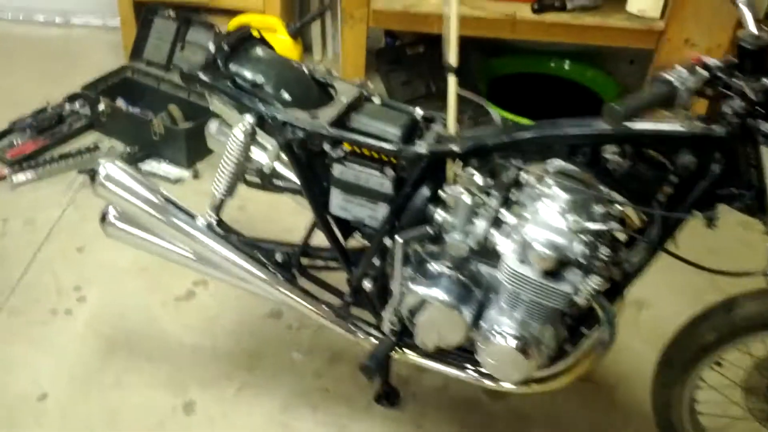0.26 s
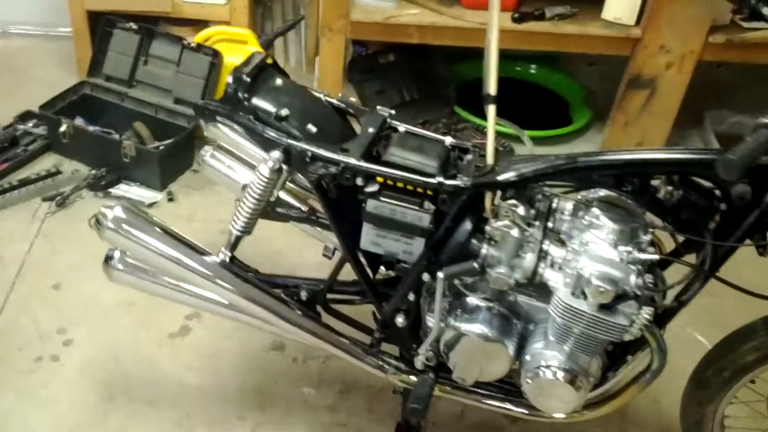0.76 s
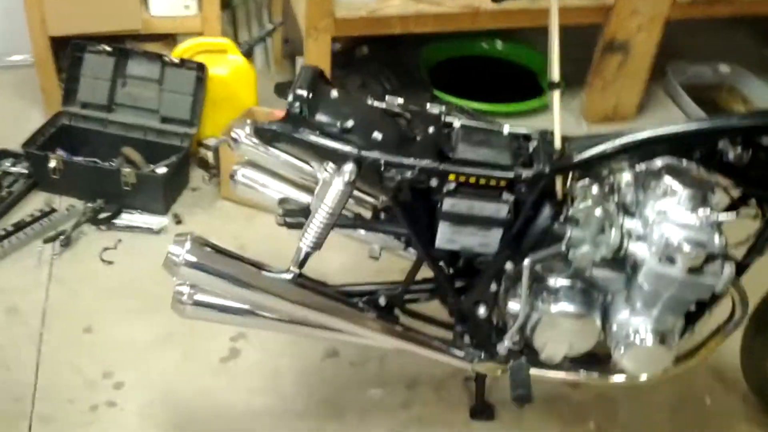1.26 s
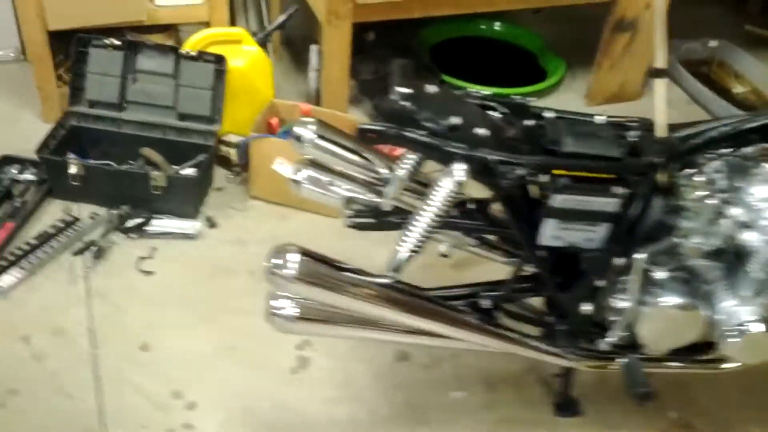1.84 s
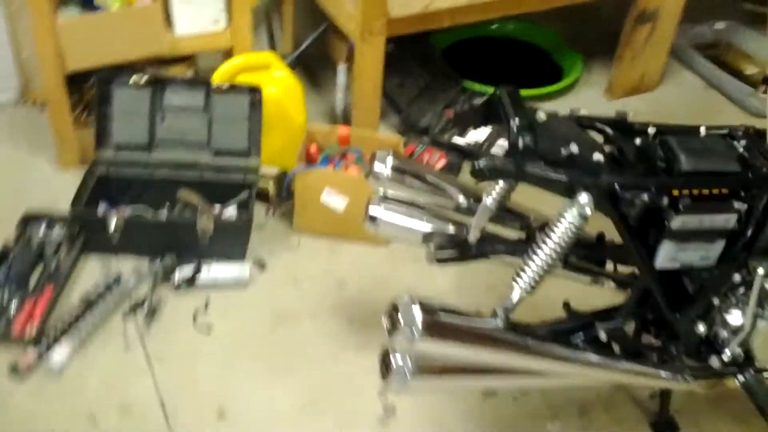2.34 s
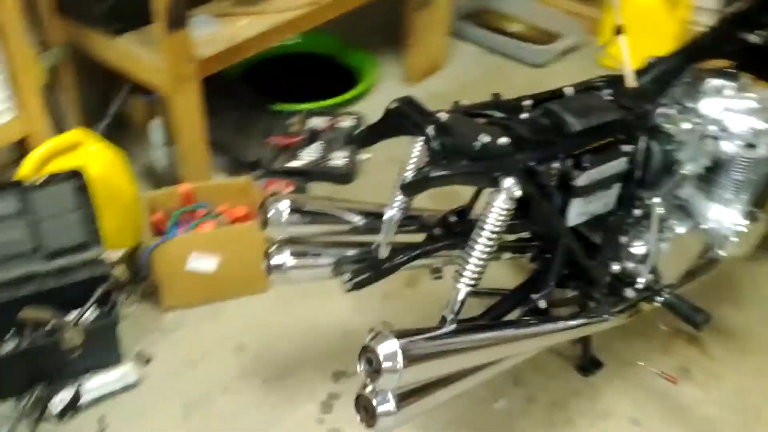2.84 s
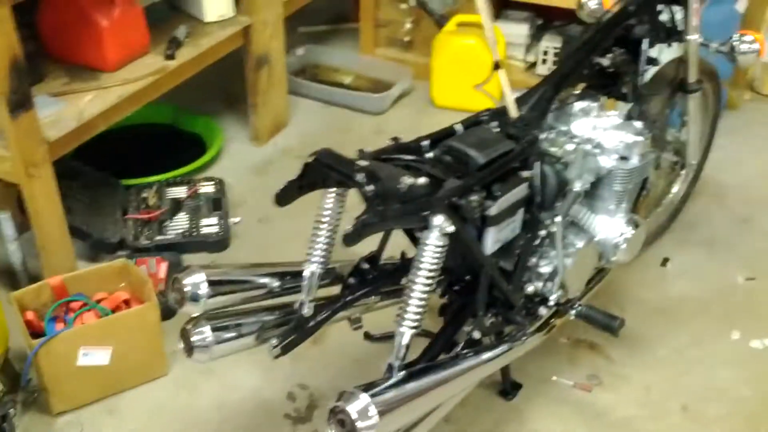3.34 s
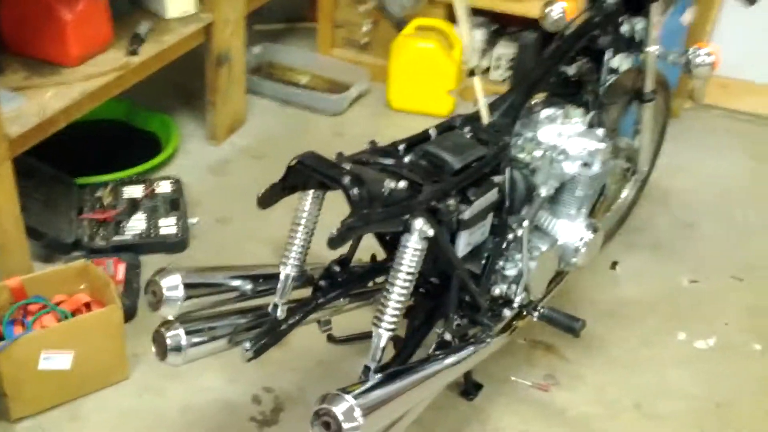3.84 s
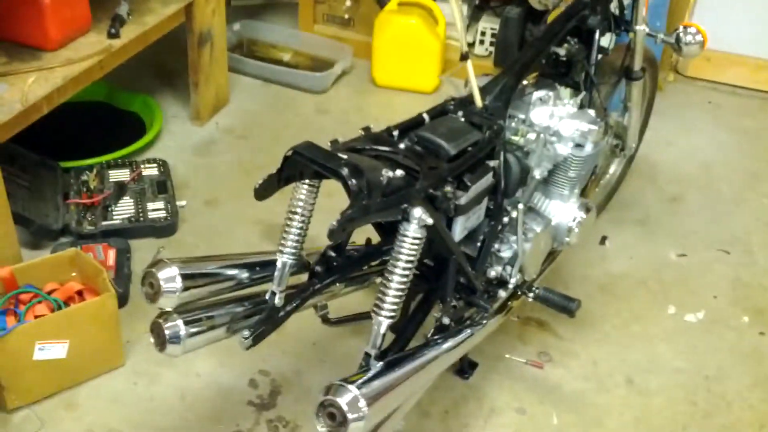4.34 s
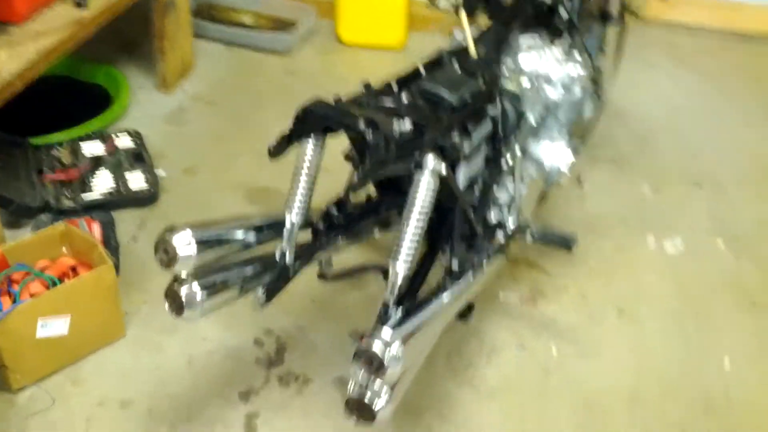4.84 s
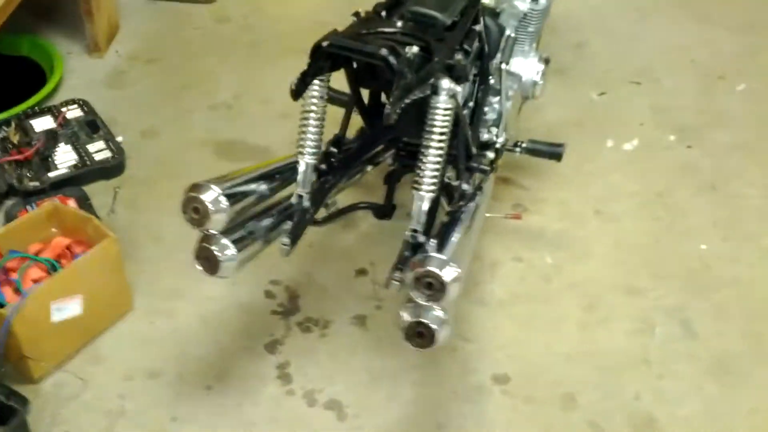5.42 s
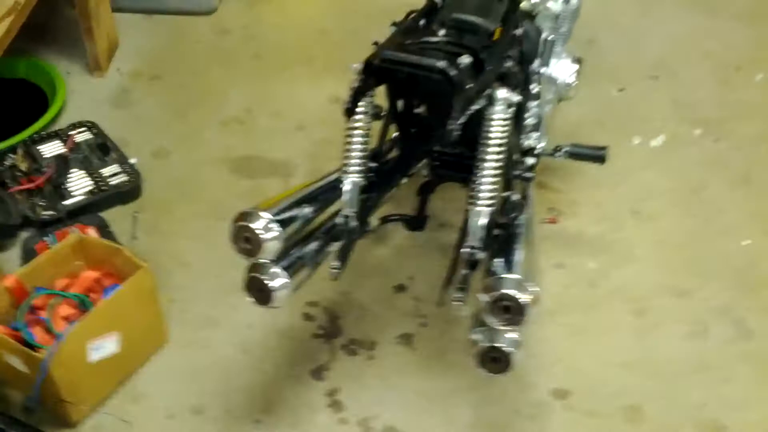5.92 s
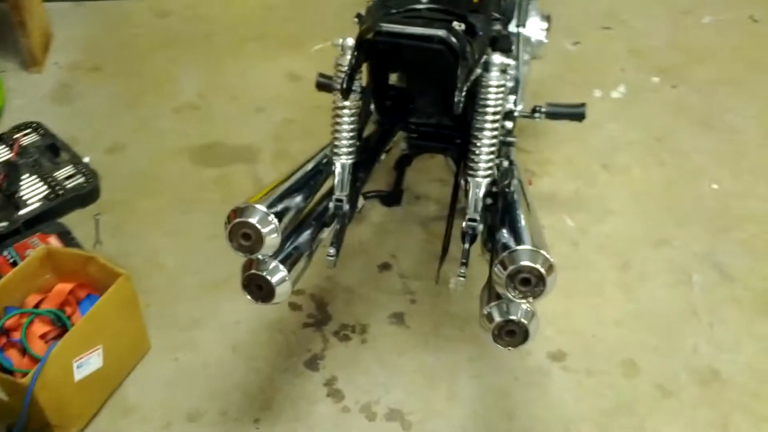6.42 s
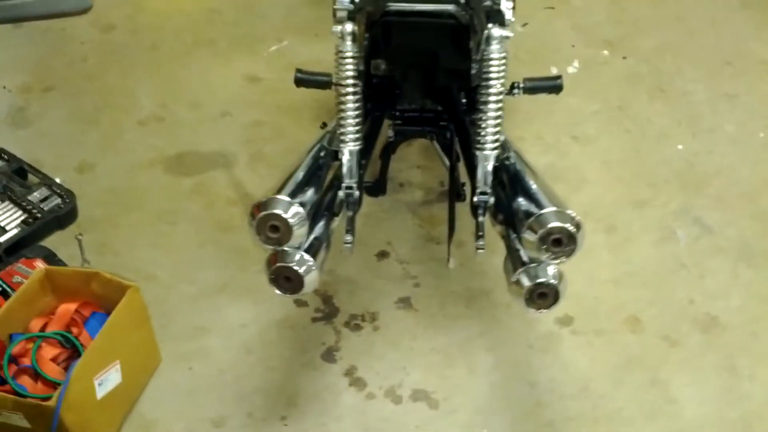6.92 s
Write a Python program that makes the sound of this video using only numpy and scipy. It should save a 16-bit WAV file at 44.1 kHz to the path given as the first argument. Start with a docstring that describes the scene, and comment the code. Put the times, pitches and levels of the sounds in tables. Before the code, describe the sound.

A four-cylinder motorcycle engine idles steadily in a garage, with a deep throbbing exhaust and a light metallic rattle.

```python
"""Motorcycle idling in a garage

An air-cooled four-cylinder engine idles through four open pipes. Its uneven firings boom in the
pipes and the room, bark, and spit gas. The slack drive chain rattles, the valve gear sizzles,
and one sharp double tick sounds. The listener walks from beside the engine round to the pipe ends."""
import sys
import numpy as np
from scipy import signal
from scipy.fft import rfft, irfft
from scipy.io import wavfile
from scipy.ndimage import uniform_filter1d

SR = 44100
rng = np.random.default_rng(int(sys.argv[2]) if len(sys.argv) > 2 else 0)


def store_wav(level_fs):
    """Save 16-bit WAV to argv[1]."""
    pcm = np.round(np.clip(np.atleast_2d(level_fs), -1, 1) * 32767)
    wavfile.write(sys.argv[1], SR, pcm.T.astype(np.int16))


N = 317079
TIME = np.arange(N) / SR


def undb(db):
    """Turn decibels into a gain."""
    return 10 ** (np.asarray(db) / 20)


def curves(table):
    """Join a table's rows with straight lines through time, one curve per column."""
    times, *columns = np.transpose(table)
    return [np.interp(TIME, times, column) for column in columns]


def unit(x):
    """Scale a sound to an average (rms) level of 1."""
    return x / np.sqrt(np.mean(x ** 2))


def steady(x, samples=17200):
    """Hold the average level near 1, keeping the quick throb."""
    power = uniform_filter1d(uniform_filter1d(x ** 2, samples), samples // 2)
    return x / np.sqrt(power + 1e-18)


def ring(x, hz, width):
    """One resonance: the smaller its width in Hz, the longer it rings."""
    return signal.lfilter(*signal.iirpeak(hz, hz / width, fs=SR), x)


def resonate(x, modes, behind):
    """Add resonances, every other one flipped; each has one level to the side and one to the rear."""
    return sum((-1) ** k * undb(side_db + behind * (rear_db - side_db)) * ring(x, hz, width)
               for k, (hz, width, side_db, rear_db) in enumerate(modes))


def lowpass(x, hz):
    """Soften the treble above hz, with a slight lift at the corner."""
    w = 2 * SR * np.tan(np.pi * hz / SR)
    return signal.lfilter(*signal.bilinear([w * w], [1, w, w * w], SR), x)


def colour(x, points):
    """Shape a sound with a tone curve, fading the bass below its first point."""
    hz, db = np.transpose(points)
    freqs = np.arange(N // 2 + 1) * SR / N + 1
    gain = undb(np.interp(np.log(freqs), np.log(hz), db)) / (1 + (hz[0] / freqs) ** 2)
    return irfft(rfft(x) * gain, N)


def fade(x, decay_s):
    """Give every click a tail that dies away."""
    return signal.lfilter([1], [1, -np.exp(-1 / (decay_s * SR))], x)


def noise():
    """An even hiss: white noise."""
    return rng.standard_normal(N)


def grains(per_second, spread_db):
    """Tiny impacts of uneven size at random moments."""
    return (rng.random(N) < per_second / SR) * noise() * undb(spread_db * noise())


# The wavering idle; each cylinder fires once a cycle: (time [s], speed [cycles/s])
IDLE_SPEED = [(0, 11.2), (0.4, 10.74), (0.9, 10.45), (1.54, 10.81), (1.72, 10.29), (2.4, 10.85),
              (2.88, 9.79), (3.38, 10.27), (4.12, 10.13), (4.35, 10.62), (4.6, 10.05), (4.94, 10.73),
              (5.18, 9.87), (6.11, 9.97), (6.2, 9.62), (6.57, 10.48), (7.2, 10.31)]
START_CYCLE, FIRING_GAP_CYCLES = 0.544, 0.247

def engine_cycles():
    """Count how many cycles the engine has turned at each moment."""
    return START_CYCLE + np.cumsum(curves(IDLE_SPEED)[0]) / SR


def firings(cylinder_db, scatter_db, jitter_s, lag_s):
    """One click per firing; the four cylinders differ, and no two firings are alike."""
    turned = engine_cycles()
    cycle, cylinder = np.divmod(np.arange(4 * int(turned[-1] + 1)), 4)
    chance = rng.standard_normal((len(cycle), 2))
    due = np.interp(cycle + cylinder * FIRING_GAP_CYCLES, turned, TIME, left=-1, right=-1)
    when = due + lag_s + jitter_s * chance[:, 0]
    size = undb(np.asarray(cylinder_db)[cylinder] + scatter_db * chance[:, 1])
    heard = (when > 0) & (when < TIME[-1])
    return np.bincount((when[heard] * SR).astype(int), size[heard], N)


# A sharp double tick: (time [s], peak level [dB])
TICK_PEAKS = [(2.2065, -4), (2.2110, -2)]

def double_tick():
    """Two very short snaps close to the listener."""
    clicks = np.zeros(N)
    for time_s, db in TICK_PEAKS:
        clicks[int(time_s * SR)] = undb(db)
    snaps = lowpass(ring(clicks, hz=3380, width=5600), hz=6500)
    return snaps * clicks.max() / np.abs(snaps).max()


# Ringing of the cooling fins and covers: (pitch [Hz], width [Hz], level [dB])
FIN_RINGS = [(4840, 72, -13), (5630, 130, -12), (8470, 140, -5.5), (11900, 230, -13)]
# Tone of the valve gear from beside and from behind: (frequency [Hz], level [dB])
GEAR_TONE_BESIDE = [(400, -2), (1500, 0), (2500, -2.5), (4000, 0.5), (5300, 4), (6200, 0.5), (7400, 0.5),
                    (8500, 2.5), (10000, 3.5), (12200, 2), (13000, 2), (15800, -7)]
GEAR_TONE_BEHIND = [(400, 9.5), (1500, 0.5), (2500, 2), (4000, 0.5), (5000, 1.5), (5800, 1), (6500, 0),
                    (7600, 0), (8600, 2.5), (10000, 1.5), (12100, 2.5), (13200, -1), (15800, -10)]

def valve_gear(cylinder_db, behind):
    """Cam chain and tappets make dense metal ticks that swell as each valve works."""
    pushes = firings(cylinder_db, scatter_db=4.5, jitter_s=0.0024, lag_s=-0.0066)
    load = 4.77 + fade(fade(pushes, decay_s=0.0071), decay_s=0.0057) / (0.0023 * SR)
    taps = load * (noise() + 2.53 * grains(per_second=1500, spread_db=1.5))
    # the cast metal rings briefly at countless pitches
    casting = noise() * np.exp(-TIME / 0.013)
    ringing = signal.fftconvolve(taps, casting / np.linalg.norm(casting))[:N]
    fins = sum(undb(db) * ring(taps, hz, width) for hz, width, db in FIN_RINGS)
    metal = taps + 0.22 * ringing + fins
    sizzle = (1 - behind) * colour(metal, GEAR_TONE_BESIDE) + behind * colour(metal, GEAR_TONE_BEHIND)
    return undb(5.5) * steady(sizzle)


# Short flurries of the slack chain: (time of the peak [s], level [dB])
CHAIN_SLAPS = [(0.01, -27), (.35, -36), (.55, -35), (.93, -35), (1.12, -31.5), (1.31, -39), (1.43, -35.5),
               (1.72, -38), (1.88, -32), (1.98, -36), (2.11, -35), (2.43, -33.5), (2.54, -33.5),
               (2.77, -34), (2.94, -38), (3.13, -32.5), (3.34, -35), (3.63, -36.5), (3.74, -42),
               (3.82, -37), (4.12, -31.5), (4.32, -42), (4.71, -35.5), (4.98, -39), (5.19, -35),
               (5.4, -35.5), (5.51, -32), (5.69, -31.5), (5.81, -32.5), (5.88, -34), (6.01, -55),
               (6.21, -31), (6.4, -34.5), (6.51, -34), (6.78, -31), (6.95, -38.5), (7.07, -47)]
SLAP_RISE_S, SLAP_FALL_S, CLATTER_DB = 0.026, 0.036, -41

def slap_strength():
    """How hard the chain rattles: each slap swells and dies away over a light, steady clatter."""
    power = np.full(N, undb(CLATTER_DB) ** 2)
    for peak_s, db in CHAIN_SLAPS:
        width_s = np.where(TIME < peak_s, SLAP_RISE_S, SLAP_FALL_S)
        power += undb(db) ** 2 * np.exp(-np.minimum(((TIME - peak_s) / width_s) ** 2, 20))
    return np.sqrt(power)


# Ringing of the crankcase: (pitch [Hz], width [Hz], level beside [dB], level behind [dB])
CASE_RINGS = [(722, 95, 3.5, 1.5), (873, 73, -1, 6), (979, 39, 2, 12.5), (1136, 310, 0.5, -2.5),
              (1370, 52, 9, -3), (1673, 180, 2.5, -2.5), (1897, 110, 1.5, 1.5), (2380, 590, -3.5, -7)]

def chain_rattle(behind, cover_db):
    """The chain knocks on the crankcase, hardest as a firing jerks it, and a thin cover rings along."""
    tugs = firings([-7, -4, -2, -8], scatter_db=4, jitter_s=0.0026, lag_s=0.0013)
    force = 0.84 + fade(tugs, decay_s=0.031)
    knocks = force * (grains(per_second=1200, spread_db=1) + 0.097 * noise())
    case = steady(lowpass(resonate(knocks, CASE_RINGS, behind), hz=3600), samples=5000)
    cover = undb(cover_db) * steady(ring(knocks, hz=1420, width=29), samples=5000)
    return slap_strength() * (case + cover) / np.sqrt(1 + undb(cover_db) ** 2)


def gas_jets(cylinder_db, rise_s=0.0004, fall_s=0.003):
    """Gas hisses out of each pipe for a few milliseconds when its exhaust valve opens."""
    pulses = firings(cylinder_db, scatter_db=1.3, jitter_s=0.0002, lag_s=0.002)
    return fade(fade(pulses, fall_s), rise_s) * noise()


# Tone of the gas from aside (bright) and facing the pipes (fuller): (frequency [Hz], level [dB])
BRIGHT_SPIT_TONE = [(1000, -19), (5000, -34), (8000, 0), (12000, 1.5), (15800, 0)]
FULL_SPIT_TONE = [(1000, 12), (3000, 9), (6000, 3), (8000, 13), (11000, 10.5), (13000, 6), (15800, -29)]
AIMED_PIPE_DB = (-20, 19.5, -10, -7)  # cylinders 1-4

def gas_spit(aside_db, facing_db, facing):
    """The jets change tone as the pipe ends come to face the listener."""
    full = colour(gas_jets(facing_db), FULL_SPIT_TONE)
    # one pipe points straight at a listener behind and sounds brightest
    aimed = colour(gas_jets(AIMED_PIPE_DB), BRIGHT_SPIT_TONE)
    aside = colour(gas_jets(aside_db), BRIGHT_SPIT_TONE)
    return unit((1 - facing) * aside + facing * (full + aimed))


def exhaust_gain(behind, beside_db, rear_boost_db, db_per_hz, idle_hz=10.3):
    """An exhaust layer's level follows the listener's place and the engine's speed."""
    extra_hz = curves(IDLE_SPEED)[0] - idle_hz
    return undb(beside_db + rear_boost_db * behind + db_per_hz * extra_hz)


# The pipes' higher notes: (pitch [Hz], width [Hz], level beside [dB], level behind [dB])
PIPE_RINGS = [(178, 5.1, 2, -3), (205.6, 13, 4, -2), (303.7, 48.4, -3, -4.5), (384, 79, -2, -6.5),
              (417, 87, -4, -9)]
PIPE_ECHO_S, PIPE_ECHO_GAIN = 0.0168, 0.95
CHUG_PEAK_CYCLE, CHUG_DB, CHUG_SWAY_S = 0.635, 1.5, 0.0012

def pipe_bark(cylinder_db, behind):
    """The sharp front of each firing and the swirling gas behind it ring the pipes."""
    pulses = firings(cylinder_db, scatter_db=1, jitter_s=0.00025, lag_s=-0.002)
    swirl = 0.03 * fade(pulses, decay_s=0.022) * noise()
    # the front runs back up the pipe and returns
    echo = PIPE_ECHO_GAIN * np.interp(TIME - PIPE_ECHO_S, TIME, pulses)
    tone = lowpass(resonate(pulses + echo + swirl, PIPE_RINGS, behind), hz=630)
    # the strong cylinders merge into one chug a cycle; their hot gas lifts the pitch, which then sinks
    swell = np.cos(2 * np.pi * (engine_cycles() - CHUG_PEAK_CYCLE))
    chug = undb(CHUG_DB * swell) * np.interp(TIME + CHUG_SWAY_S * swell, TIME, tone)
    bark = steady(signal.sosfilt(signal.butter(4, 160, "high", fs=SR, output="sos"), chug))
    return bark * exhaust_gain(behind, beside_db=-33.5, rear_boost_db=0.8, db_per_hz=1.5)


def boom(mode, scatter_db, lag_s):
    """Soft pushes of pressure keep one low resonance of pipes and garage swinging."""
    hz, width, *push_db = mode
    pulses = firings(push_db, scatter_db, jitter_s=0.0002, lag_s=lag_s)
    # four unheard cycles come first, so the boom is already going at the start
    lead_in = round(4 * SR / np.mean(curves(IDLE_SPEED)[0][:17000]))
    swing = ring(np.concatenate([pulses[:lead_in], pulses]), hz, width)
    return steady(lowpass(lowpass(swing, hz=153), hz=153)[-N:])


# Low resonances; the hum is a faint standing wave of the garage:
# (pitch [Hz], width [Hz], push of each of cylinders 1-4 [dB])
GARAGE_HUM = (63, 4, 13, -3, 22.5, 18.5)
DEEP_DRONE = (54.5, 7.5, 2, 10.5, 10.5, 10)
LOWER_BOOM = (98.5, 10.5, 0.5, 7, 7, 7.5)
UPPER_BOOM = (122.5, 11.5, -7, -7.5, -6, -4.5)

def exhaust_boom(behind, lead_s=0.00785):
    """Four low resonances throb; as the idle speeds up, the upper boom gives way to the lower."""
    upper = boom(UPPER_BOOM, scatter_db=1.3, lag_s=-lead_s)  # both booms start ahead of the spit
    lower = boom(LOWER_BOOM, scatter_db=0.94, lag_s=-lead_s)
    hum = boom(GARAGE_HUM, scatter_db=1.5, lag_s=0)
    drone = boom(DEEP_DRONE, scatter_db=-0.4, lag_s=0.0029)
    drone = unit(ring(drone, hz=50, width=90))
    upper *= exhaust_gain(behind, beside_db=-18.5, rear_boost_db=2.1, db_per_hz=-1.5)
    lower *= exhaust_gain(behind, beside_db=-21, rear_boost_db=-0.7, db_per_hz=1.26)
    hum *= exhaust_gain(behind, beside_db=-43, rear_boost_db=5.5, db_per_hz=0)
    drone *= exhaust_gain(behind, beside_db=-30.5, rear_boost_db=4.2, db_per_hz=0)
    return upper - lower + hum - drone  # neighbouring resonances swing opposite ways


# How the cylinders compare, in firing order:
# (bark [dB], spit from aside [dB], spit facing the pipes [dB], valve gear [dB])
CYLINDER_LEVELS = [(-5.5, -17, -14, -38), (-6.5, 11, 8, -1.5), (1.5, 10.5, 7, 4), (-2.5, 11, 8.5, 4.5)]
# The listener's walk: (time [s], way round to the back [0-1], facing the pipe ends [0-1],
# gas spit [dB], valve gear gain [dB], cover compared with crankcase [dB])
LISTENER_WALK = [(0, 0, 0, -39.5, -31.5, -19), (1.0, 0.08, 0, -36, -31.5, -14),
                 (2.15, 0.37, 0.09, -35, -30.5, -3), (2.35, .45, .2, -35, -35, 1.5),
                 (3.1, 0.74, 0, -34.5, -35.5, -5), (4.9, 0.86, .18, -32.5, -35.8, -3.5),
                 (5.5, 0.98, 0.41, -35.5, -35.5, -4), (6.1, 0.8, 0.58, -34, -33.5, -2.5),
                 (7.19, 0.68, 0.76, -35, -33, -7)]

def scene():
    """The engine's exhaust and moving parts, heard along the walk."""
    behind, facing, spit_db, gear_db, cover_db = curves(LISTENER_WALK)
    cylinder_bark, spit_aside, spit_facing, cylinder_gear = np.transpose(CYLINDER_LEVELS)
    booms = exhaust_boom(behind)
    bark = pipe_bark(cylinder_bark, behind)
    spit = undb(spit_db) * gas_spit(spit_aside, spit_facing, facing)
    chain = chain_rattle(behind, cover_db)
    valves = undb(gear_db) * valve_gear(cylinder_gear, behind)
    return (double_tick() + valves + chain + spit + bark + booms)[None]


def record(dry):
    """A small microphone loses the deepest bass, and the highest treble is cut."""
    thin = signal.sosfilt(signal.butter(1, 12, "high", fs=SR, output="sos"), dry)
    return signal.sosfilt(signal.ellip(10, 0.2, 80, 15850, fs=SR, output="sos"), thin)


dry = scene()
out = record(dry)
store_wav(out)
```